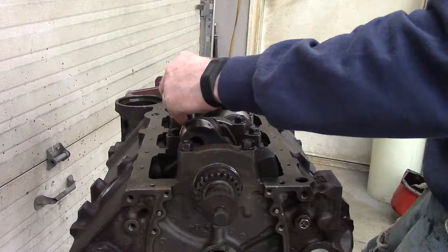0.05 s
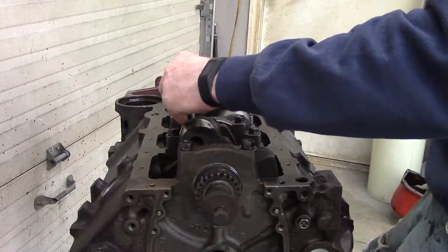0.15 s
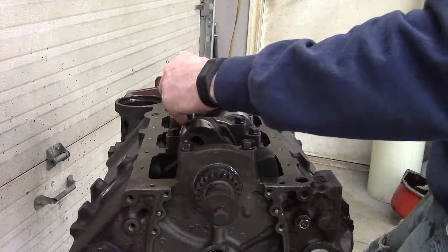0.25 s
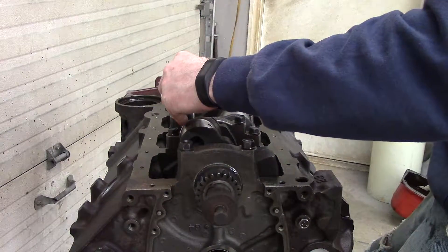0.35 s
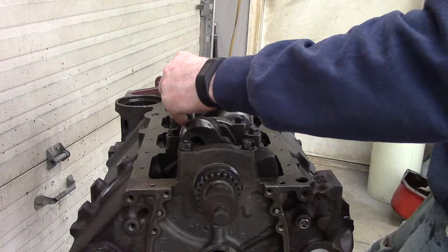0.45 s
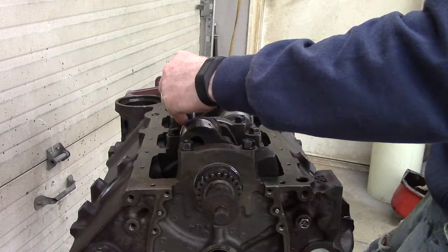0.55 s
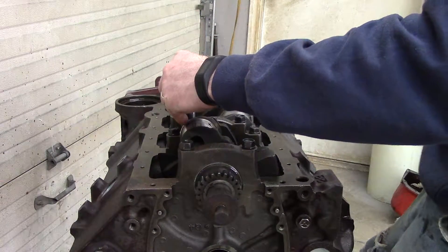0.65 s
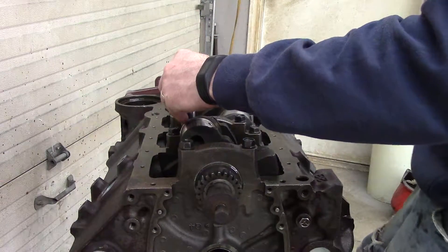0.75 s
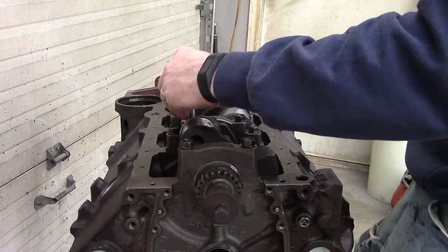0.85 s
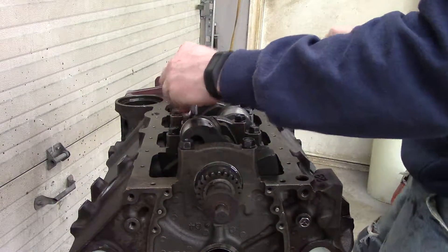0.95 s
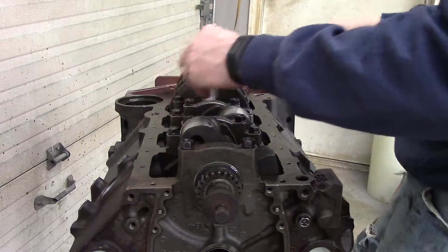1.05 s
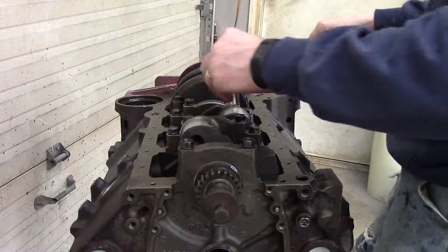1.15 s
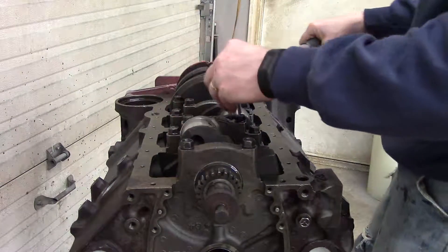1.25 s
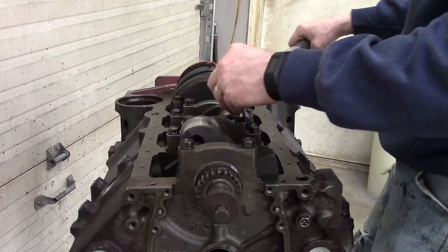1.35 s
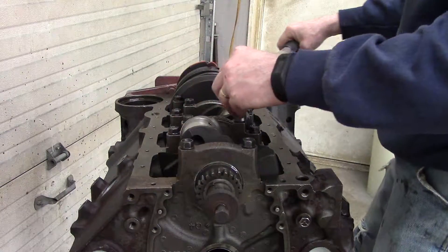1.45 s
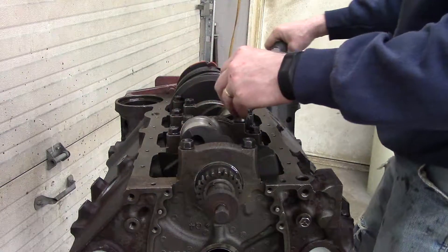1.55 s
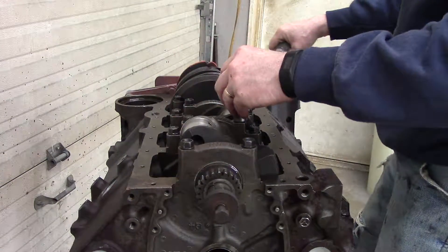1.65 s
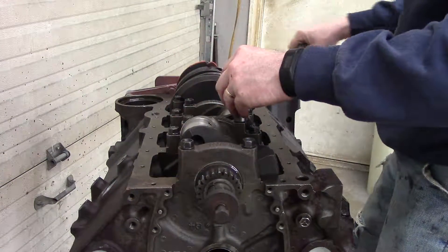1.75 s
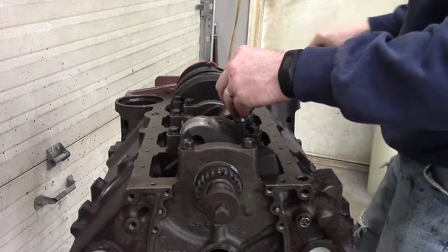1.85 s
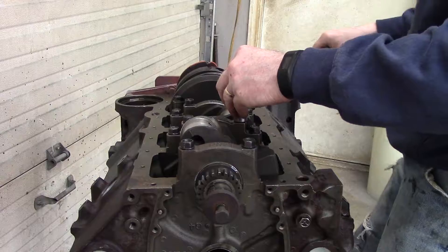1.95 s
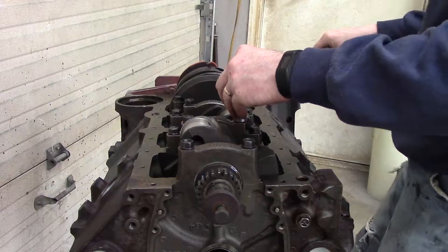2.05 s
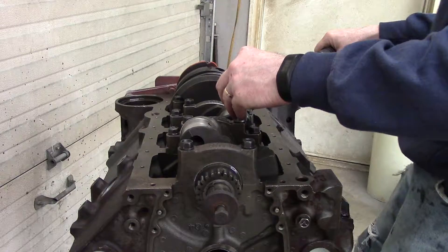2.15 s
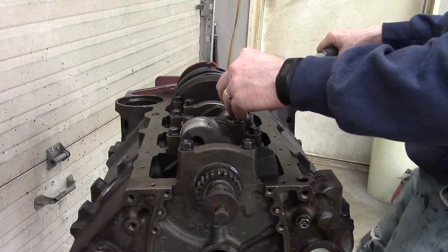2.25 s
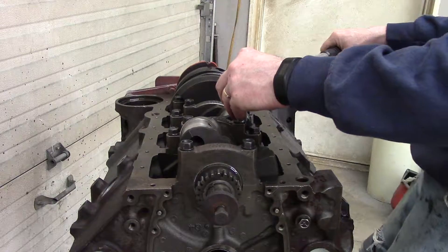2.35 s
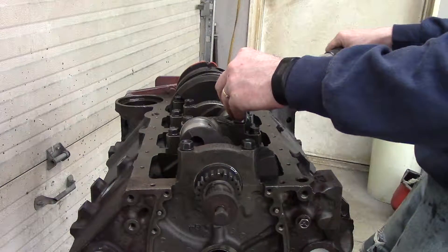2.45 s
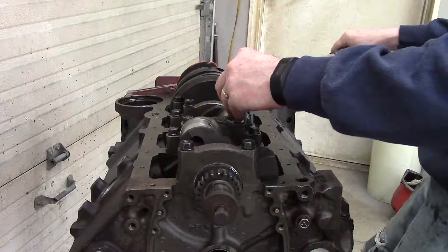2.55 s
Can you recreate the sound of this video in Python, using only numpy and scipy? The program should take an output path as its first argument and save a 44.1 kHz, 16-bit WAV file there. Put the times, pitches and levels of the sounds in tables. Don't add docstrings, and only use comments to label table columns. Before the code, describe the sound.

Two sharp metallic torque wrench snaps ring in a hard-walled garage, followed by small socket clacks

```python
import sys
import numpy as np
from scipy import signal
from scipy.fft import rfft, irfft, next_fast_len
from scipy.io import wavfile
from scipy.ndimage import uniform_filter1d, map_coordinates

SR = 44100
rng = np.random.default_rng(int(sys.argv[2]) if len(sys.argv) > 2 else 0)


def gain_from_decibels(decibels):
    exponent = np.asarray(decibels, float) / 20
    return 10 ** exponent


def digitize_waveform(pressure):
    field = np.atleast_2d(pressure).T
    bounded = np.clip(field, -1, 1)
    quanta = np.round(bounded * 32767).astype(np.int16)
    wavfile.write(sys.argv[1], SR, quanta)


N = 114660


def unit(x):
    return x / np.sqrt(np.mean(x ** 2) + 1e-20)


def gains(points, hz):
    f, db = np.transpose(points)
    return gain_from_decibels(np.interp(np.log(hz + 1), np.log(f + 1), db))


def coloured(x, points):
    m = next_fast_len(x.shape[-1] + 4096)
    spectrum = rfft(x, m) * gains(points, np.fft.rfftfreq(m, 1 / SR))
    return irfft(spectrum, m)[..., :x.shape[-1]]


def cricket():
    note_hz, chorus_db, edge_s = 5570, -85, 0.0037
    # t/s, length/s, level/dB
    chirps = [
        (0.208, 0.056, -69),
        (1.17, 0.11, -77),
        (1.412, 0.036, -72),
        (1.94, 0.19, -79),
        (1.794, .034, -71),
        (1.863, .035, -70),
        (2.312, .038, -72),
        (2.397, .034, -72),
        (2.463, .032, -71),
        (2.548, .034, -71),
    ]
    t = np.arange(N) / SR
    gate = sum(gain_from_decibels(db) * np.clip(np.minimum(t - s, s + long - t) / edge_s, 0, 1) for s, long, db in chirps)
    drift = map_coordinates(rng.standard_normal(60), [t * 14])
    return 2 ** .5 * (gate + gain_from_decibels(chorus_db + 2 * drift)) * np.sin(2 * np.pi * note_hz * t)


def room_tone():
    floor_db = -60
    # f/Hz, level/dB
    floor = [(15, -61), (25, -37.5), (82, -15), (293, -10), (354, -7), (641, -11), (818, -13.5),
             (5430, -26.5), (16000, -39.5)]
    # f/Hz, level/dB
    side_floor = [(60, -9), (240, -6.5), (950, -5.5), (3770, -9), (15000, -10)]
    # f/Hz, width/Hz, level/dB
    drones = [(112, 20, -73), (344.4, 23, -71), (1615, 120, -72.5)]
    mid, side = coloured(rng.standard_normal((2, N)), floor)
    gain = gain_from_decibels(floor_db) / np.std(mid)
    hum = 0
    for hz, w, db in drones:
        band = [(hz - 2 * w, -40), (hz - w / 2, -3), (hz, 0), (hz + w / 2, -3), (hz + 2 * w, -40)]
        hum = hum + gain_from_decibels(db) * unit(coloured(rng.standard_normal(N), band))
    return np.array([gain * mid + hum, gain * coloured(side, side_floor)])


def garage(x, early_db, early_t60):
    # f/Hz, t60/s
    fading = [(200, 0.17), (600, 0.61), (2000, 0.7), (6000, 0.64), (10000, 0.42), (15000, 0.4)]
    hz, t, z = signal.stft(rng.standard_normal((2, SR)), SR, nperseg=256)
    f, t60 = np.transpose(fading)
    fade_s = np.interp(np.log(hz + 1), np.log(f), t60)[:, None]
    fall = gain_from_decibels(-60 * t / fade_s) * (1 + gain_from_decibels(early_db - 60 * t / early_t60))
    tail = signal.istft(z * fall, SR, nperseg=256)[1]
    late = np.pad(x, (150, 0))[None]
    return signal.fftconvolve(late, tail / np.linalg.norm(tail[0]), axes=1)[:, :N]


def struck(x, shape):
    z = rfft(x)
    own = np.sqrt(np.abs(uniform_filter1d(np.abs(z) ** 2, size=150))) + 1e-9
    cep = irfft(np.log(shape / own + 1e-9), N)
    cep[1:N // 2] *= 2
    cep[N // 2 + 1:] = 0
    y = irfft(z * np.exp(rfft(cep)), N)
    return y / np.linalg.norm(y)


def strikes(events, modes, colour, crack_db, crack_t60, ring_db, short, long_db, wet_db, spread_hz=120, rise=1e-4):
    # f/Hz, level/dB
    thin = [(60, -20.5), (140, -8.5), (260, -1), (400, -13.5), (450, 0)]
    hz, db, t60 = (c[:, None] for c in np.transpose(modes))
    f, t = np.fft.rfftfreq(N, 1 / SR), np.arange(SR * 3 // 5) / SR
    start = round(events[0][0] * SR)
    after = [(np.maximum(t - s + events[0][0], 0), level_db) for s, level_db in events]
    cracks, rings = np.zeros((2, N + SR))

    cracks[start:][:len(t)] = sum(
        gain_from_decibels(g - 60 * u / crack_t60) * (1 - np.exp(-u / rise)) * rng.standard_normal(len(t)) for u, g in after)
    half = np.log(1000) / (2 * np.pi * short * t60)
    peaks = (gain_from_decibels(db + ring_db) * half ** 2 / (half ** 2 + (f - hz) ** 2)) ** 2
    shape = gains(thin, f) * np.sqrt(gains(colour, f) ** 2 + peaks.sum(0))
    blow = gain_from_decibels(crack_db) * np.linalg.norm(cracks) * struck(cracks[:N], shape)

    swell = np.sqrt(sum(gain_from_decibels(2 * (g - 60 * u / t60)) * (1 - np.exp(-u / 0.02)) ** 2 for u, g in after))
    draw = rng.standard_normal((2, 14, len(modes), 1))
    offset = np.linspace(-.5, .5, num=14)[:, None, None] + .05 * draw[0]
    cluster = np.sin(2 * np.pi * (hz + spread_hz * offset) * t + 3 * draw[1]).sum(0) * .65
    rings[start:][:len(t)] = (gain_from_decibels(db + long_db) * swell * cluster).sum(0)

    dry = blow + rings[:N]
    wet = gain_from_decibels(wet_db) * garage(dry, early_db=6.0, early_t60=0.071)
    return np.array([dry + wet[0], wet[1]])


def flares(rows):
    rise_s = 0.00051
    dry = 0
    for s, hz, db, t60 in rows:
        t = np.maximum(np.arange(N) / SR - s, 0)
        dry = dry + gain_from_decibels(db - 60 * t / t60) * (1 - np.exp(-(t / rise_s) ** 2)) * np.sin(2 * np.pi * hz * t)
    wet = gain_from_decibels(-10.5) * garage(dry, early_db=0.5, early_t60=0.097)
    return np.array([dry + wet[0], wet[1]])


def stand():
    # t/s, level/dB
    jolts = [
        (0.25, -38.5),
        (0.686, -41.5),
    ]
    # f/Hz, level/dB, rise/s, t60/s
    sway = [(199, 1.5, .075, .68), (64, -14, .06, .6), (275, -14, .04, .4), (340, -11, .04, .4),
            (150, -16, .02, .3)]
    hum = 0
    for s, jolt_db in jolts:
        u = np.maximum(np.arange(N) / SR - s, 0)
        for hz, db, rise, t60 in sway:
            swell = gain_from_decibels(jolt_db + db - 60 * u / t60) * (1 - np.exp(-(u / rise) ** 2))
            hum = hum + swell * np.sin(2 * np.pi * hz * u)
    return hum


def socket():
    # t/s, peak level/dB
    lifted = [
        (0.987, -23),
        (0.9925, -23),
        (0.998, -27),
        (1.002, -31),
        (1.007, -33),
    ]
    dropped = [
        (1.3475, -23.5),
        (1.351, -24),
        (1.356, -37),
        (1.366, -32.5),
        (1.376, -42),
    ]
    nudged = [
        (1.4605, -27),
        (1.465, -28.5),
        (1.472, -46),
    ]
    seated = [
        (1.4855, -17.5),
        (1.489, -16.5),
        (1.495, -22.5),
        (1.565, -39),
    ]
    settled = [
        (1.7995, -38),
        (1.803, -44.5),
        (1.91, -50),
        (2.25, -58.5),
    ]
    ticked = [
        (1.933, -60),
    ]
    # f/Hz, level/dB, t60/s
    steel = [(1040, -16, 0.58), (1767, -5, 0.52), (2235, -7, 0.15), (2490, -6.5, 0.19), (3450, -20, 0.14),
             (3280, -1, 0.21), (3420, -4.5, 0.22), (3850, -4, 0.19), (4525, -4.5, 0.39), (5660, -7, 0.31),
             (6170, -16, 0.11), (6760, -23, 0.11), (10900, -33, 0.2)]
    pawl = [(10700, -6, .2), (11400, -8, .06), (12200, -2, 0.046)]
    # f/Hz, level/dB per Hz
    knock = [(300, -32.5), (800, -1.5), (1300, -4.5), (1800, 0.5), (3200, -5.5), (4500, -11), (7000, -18.5),
             (12000, -33), (14000, -57)]
    tap = [(300, -30), (775, -19), (943, -11), (1150, -13), (1400, -3), (3330, -3), (6000, -16),
           (11200, -29), (14000, -67)]
    graze = [(180, -43), (300, -47), (1820, 3), (2820, -18), (3440, -1.5), (7300, -14.5), (15000, -50)]
    clack = [(300, -68), (943, -3), (1120, -10.5), (2440, -6.5), (3330, -1.5), (6800, -5), (8500, -18),
             (12500, -28), (14500, -67)]
    pawl_tone = [(8000, -41), (11000, 6), (14000, -19)]
    # t/s, f/Hz, peak level/dB, t60/s
    flare_socket = [(1.3480, 953, -42.5, 0.12), (1.3480, 2190, -41.5, 0.12), (1.3480, 2440, -43, 0.088),
                    (1.3480, 3100, -38, 0.066), (1.3480, 3400, -37.5, 0.09), (1.3500, 1360, -42, .08),
                    (1.461, 3420, -39, 0.056), (1.4860, 933, -35.5, 0.089), (1.4870, 3390, -41.5, 0.37),
                    (1.4870, 4550, -52, .06), (1.4910, 6410, -28.5, .03), (1.4880, 2490, -43, 0.049),
                    (1.4880, 5790, -38, 0.12), (1.9070, 1788, -53, .05), (2.2460, 2750, -61, 0.044)]

    lift = strikes(lifted, steel, knock, crack_db=-2, crack_t60=0.018, ring_db=0.5, short=0.02,
                   long_db=-42, wet_db=-1.5, rise=0.0034)
    drop = strikes(dropped, steel, tap, crack_db=-8, crack_t60=0.023, ring_db=6.0, short=0.067,
                   long_db=-38, spread_hz=67, wet_db=-0.5)
    nudge = strikes(nudged, steel, graze, crack_db=-1.5, crack_t60=0.019, ring_db=2.5, short=0.051,
                    long_db=-35, spread_hz=220, wet_db=1)
    seat = strikes(seated, steel, clack, crack_db=-7.0, crack_t60=0.025, ring_db=9, short=0.12,
                   long_db=-38.5, spread_hz=200, wet_db=-3)
    rest = strikes(settled, steel, knock, crack_db=-6.0, crack_t60=0.015, ring_db=-9, short=0.12,
                   long_db=-39, wet_db=0.5, rise=0.000356)
    tick = strikes(ticked, pawl, pawl_tone, crack_db=-2, crack_t60=0.018, ring_db=3.5, short=.3,
                   long_db=-13, wet_db=-6, spread_hz=30)
    return lift + drop + nudge + seat + rest + tick + flares(flare_socket)


def snaps():
    # t/s, peak level/dB
    snap_a = [
        (0.2490, -0.5),
        (0.2505, 4.5),
        (0.2540, -6.5),
        (0.2590, -29),
    ]
    snap_b = [
        (0.6860, 1),
        (0.6890, -3.5),
        (0.6945, -15),
    ]
    fall_home = [
        (0.6935, -9.5),
        (0.6948, -18),
    ]
    # f/Hz, level/dB,
    # t60/s
    ring_a = [(458.8, -15.5, .25), (599, -14, 0.4), (1010, -7, 0.22), (1098, -15, 0.53), (1733, -12, 0.22),
              (2215, -4, 0.37), (2390, -13, .35), (3050, -10.5, .45), (4310, -10.5, .33),
              (3700, -12.5, .35), (4340, -12.5, .44), (6580, -12, .3), (6900, -13, .22),
              (10600, -17.5, 0.39)]
    ring_b = [(453.4, -15.5, 0.18), (340.2, -22, 0.4), (1022, -9, 0.41), (1865, -5.5, 0.27),
              (1948, -5, 0.28), (1995, -11, 0.38), (2380, -9.5, .45), (2810, -14, .35), (3627, -8.5, 0.34),
              (4540, -8.5, 0.3), (5240, -9, 0.48), (6365, -12, .35), (7280, -11, 0.23), (10590, -24, .42)]
    ring_b_more = [(3265, 1.5, .4), (4220, -3.5, 0.63), (5340, 5, 0.17), (5630, -4.5, .35), (8210, -4.5, 0.44)]
    # f/Hz, level/dB per Hz
    crack_a = [(250, -33), (750, -16), (1060, -7), (1450, -10.5), (2300, -3.5), (7200, -9.5), (9200, -18.5),
               (11500, -14.5), (16000, -32.5)]
    crack_b = [(250, -38), (450, -16), (1020, -11), (1500, -11), (1980, -9), (3400, -11.5), (6280, -9.5),
               (11300, -19.5), (16000, -36.5)]
    # t/s, f/Hz, peak level/dB, t60/s
    flare_a = [(.2490, 1022, -13, 0.063), (.2497, 2123, -8, 0.021), (.2495, 11030, -17, 0.024),
               (.2495, 10600, -22.5, .1), (.2520, 3090, -16, 0.051), (.2520, 7100, -13, 0.053),
               (.2530, 2490, -20.5, 0.024), (.2540, 6300, -12, 0.034), (.2550, 5910, -18.5, 0.054),
               (.2560, 4235, -17.5, .04), (.2455, 3040, -40.5, 0.017), (.2640, 4198, -20.5, 0.12),
               (.2670, 1000, -16, 0.023), (.2790, 2215, -18.5, 0.12), (.2810, 6400, -19.5, 0.033)]
    flare_b = [(.6860, 960, -17.5, .05), (.6860, 1875, -13, 0.045), (.6860, 3385, -13, .04),
               (.6865, 9040, -15.5, 0.04), (.6865, 10900, -19.5, .04), (.6865, 6140, -18.5, .03),
               (0.689, 4363, -12.5, 0.042), (.6910, 7530, -19, 0.027), (0.6931, 6250, -3, 0.015),
               (0.695, 5340, -19, 0.03), (.7050, 1865, -19, 0.085), (.7150, 5370, -19, .04),
               (0.72, 1010, -25, 0.086)]

    first = strikes(snap_a, ring_a, crack_a, crack_db=-11.5, crack_t60=0.023, ring_db=4.0, short=0.035,
                    spread_hz=130, long_db=-37.0, wet_db=0.0)
    second = strikes(snap_b, ring_b, crack_b, crack_db=-7, crack_t60=0.018, ring_db=3.0, short=0.045,
                     spread_hz=210, long_db=-32.5, wet_db=-0.5)
    ping = strikes(fall_home, ring_b_more, crack_b, crack_db=-14.5, crack_t60=0.031, ring_db=4.5, short=0.023,
                   long_db=-29.5, wet_db=-9)
    return first + second + ping + flares(flare_a) + flares(flare_b)


def scene():
    spacing_s, left_db = 4e-6, -0.63
    # f/Hz, level/dB
    side_hit = [(60, -9.5), (240, -14), (950, -25.5), (3770, -17), (15000, -20)]
    mid, side = socket() + snaps()
    side = coloured(side, side_hit) + spacing_s * SR * np.gradient(mid)
    room_mid, room_side = room_tone()
    mid = mid + stand() + cricket() + room_mid
    side = side + room_side
    return np.array([mid + side, mid - side]) * gain_from_decibels([[left_db / 2], [-left_db / 2]])


def band_limit(x):
    return signal.sosfilt(signal.butter(12, 16830, fs=SR, output="sos"), x)


def record(dry):
    ceiling = .9
    # f/Hz, level/dB
    ceiling_band = [(300, -40), (700, 0)]
    # f/Hz, level/dB
    mic = [(12000, 0), (14000, -2), (15500, -5), (16300, -14), (16700, -30), (16850, -90)]
    flattened = dry / (1 + (dry / ceiling) ** 8) ** (1 / 8)
    mix = dry + coloured(flattened - dry, ceiling_band)
    return band_limit(coloured(mix, mic))


dry = scene()
out = record(dry)
digitize_waveform(out)
```